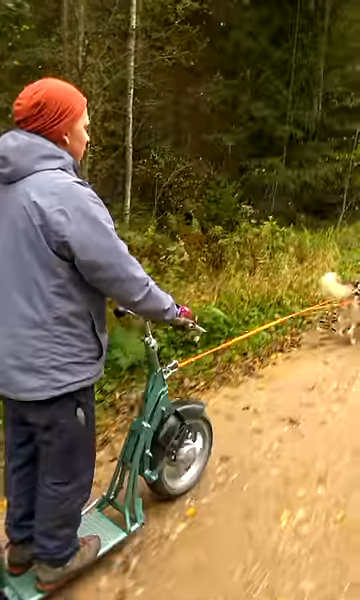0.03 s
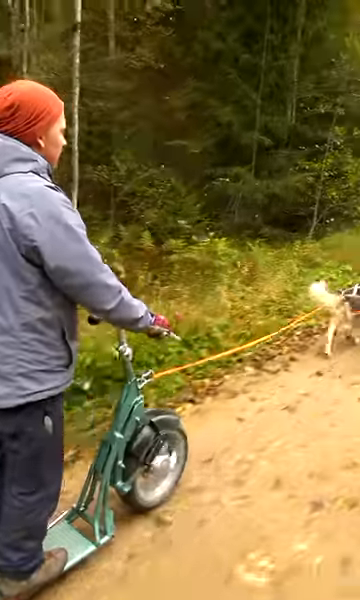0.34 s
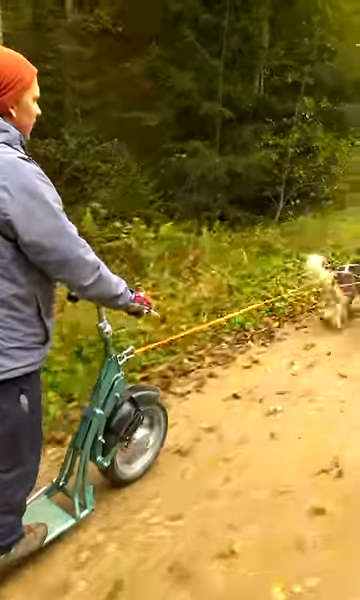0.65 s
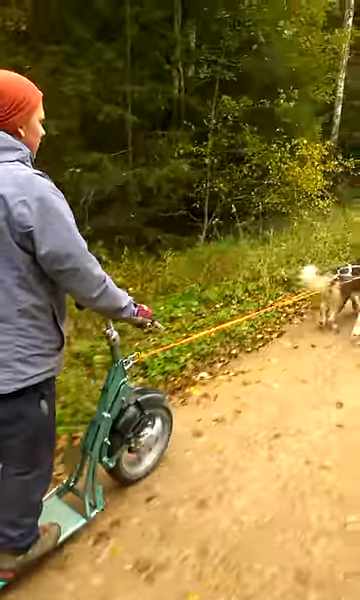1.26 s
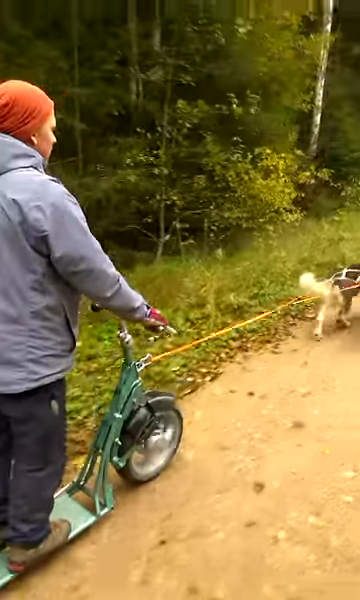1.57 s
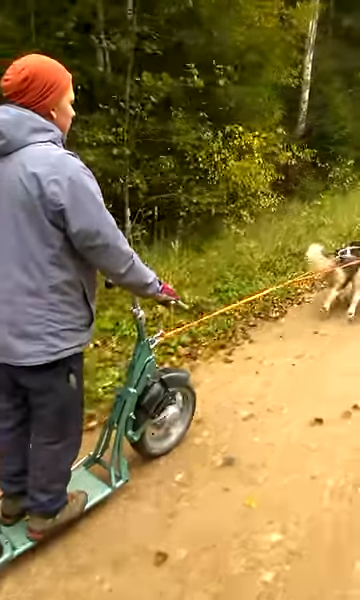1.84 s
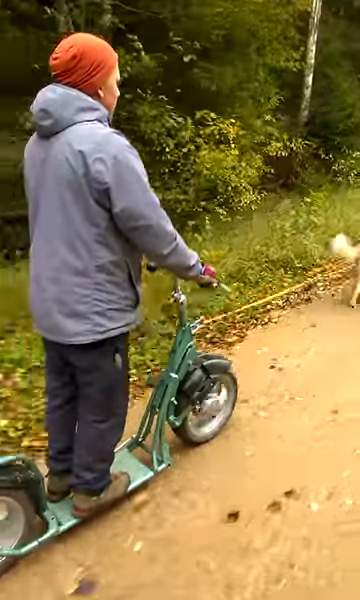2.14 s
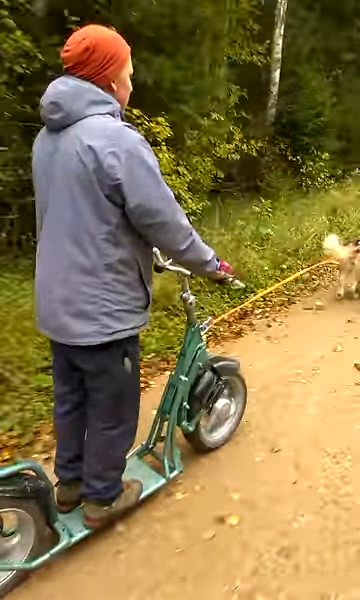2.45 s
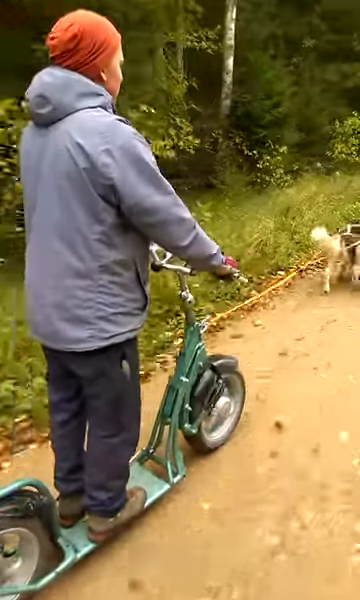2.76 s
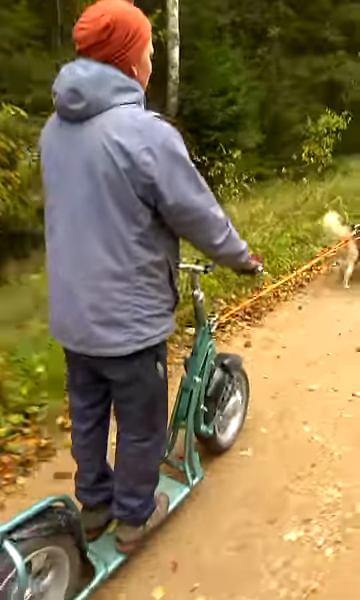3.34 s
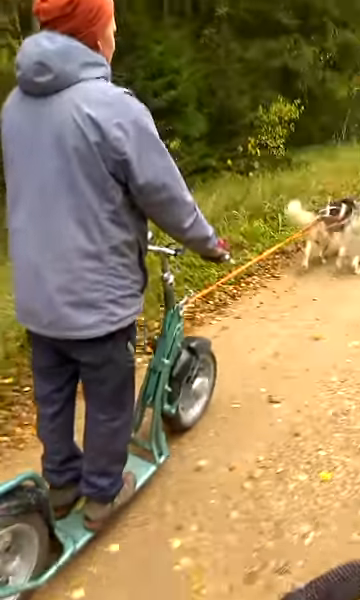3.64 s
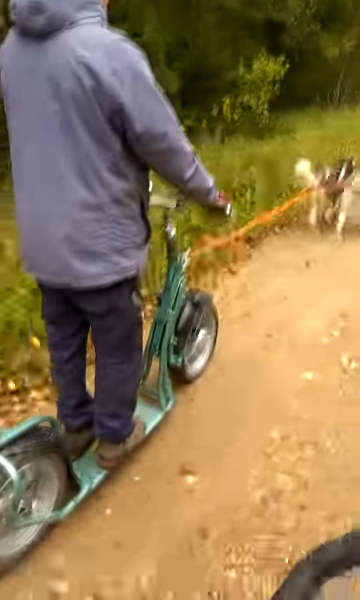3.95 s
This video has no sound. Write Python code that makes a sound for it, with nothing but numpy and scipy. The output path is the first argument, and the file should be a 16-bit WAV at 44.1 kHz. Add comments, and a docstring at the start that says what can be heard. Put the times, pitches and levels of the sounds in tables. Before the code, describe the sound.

Tyres crunch steadily over a gravel road while wind buffets the microphone.

```python
"""A dog-drawn scooter rolls along a gravel forest road, heard from a vehicle keeping pace.
From the start the tyres crunch grit, hiss through sand and scrub; headwind rumbles on one microphone.
From 0.1 s on, sand grains split, pinched pebbles snap aside and brief hollow scrapes sound.
Eddies thump on the microphone from 0.45 s, pause after 1.5 s and return at 2.5 s.
By 2.85 s the packed road has given way to looser grit; a low-ringing pebble ticks just before 3 s."""
import sys
import numpy as np
from scipy import signal
from scipy.fft import rfft, irfft
from scipy.io import wavfile
from scipy.ndimage import uniform_filter1d

SR = 44100
rng = np.random.default_rng(int(sys.argv[2]) if len(sys.argv) > 2 else 0)


def file_out(sig):
    """Save sig as 16-bit WAV at sys.argv[1]."""
    # one column per channel
    cols = np.atleast_2d(sig).T
    # limit, then scale
    lim = np.clip(cols, -1, 1)
    pcm = np.round(lim * 32767).astype(np.int16)
    wavfile.write(sys.argv[1], SR, pcm)


N = 176400
TIME_S = np.arange(N) / SR
TOP_HZ = 10600


def undb(db):
    """Decibels to gain."""
    return 10 ** (np.asarray(db) / 20)


def unit(x):
    """Scale to standard deviation 1."""
    return x / np.std(x)


def curve(rows):
    """Gain along rows of (time [s], level [dB])."""
    return undb(np.interp(TIME_S, *np.array(rows).T))


def colour(x, points):
    """Minimum-phase filter through points of (frequency [Hz], gain [dB])."""
    hz, db = np.array(points).T
    bins_hz = np.fft.rfftfreq(len(x), 1 / SR) + 1e-9
    gain = undb(np.interp(np.log(bins_hz), np.log(hz), db))
    cepstrum = irfft(np.log(gain), len(x))
    cepstrum[1:len(x) // 2] *= 2
    cepstrum[len(x) // 2 + 1:] = 0
    return irfft(rfft(x) * np.exp(rfft(cepstrum)), len(x))


def ring(x, hz, width_hz):
    """One resonance."""
    return signal.lfilter(*signal.iirpeak(hz, hz / width_hz, fs=SR), x)


def drift(rate_hz):
    """Smooth random drift, standard deviation 1."""
    span = max(int(SR / rate_hz), 2)
    smoothed = uniform_filter1d(rng.standard_normal(N), span, mode="wrap")
    return unit(uniform_filter1d(smoothed, span, mode="wrap"))


def clicks(per_s, spread_db):
    """Random impacts, most small, a few large."""
    strength = np.minimum(rng.exponential(size=N), 5)
    hits = rng.random(N) < per_s / SR
    return hits * rng.choice([-1, 1], N) * undb(spread_db * strength)


def grains(per_s, spread_db, ring_s, sizes=28):
    """Stones of many sizes, each ringing briefly at its own pitch."""
    pitches_hz = np.linspace(400, TOP_HZ, sizes)
    width_hz = 1 / (np.pi * ring_s)
    return unit(sum(ring(clicks(per_s / sizes, spread_db), hz, width_hz) for hz in pitches_hz))


def grit_crunch(ticks):
    """Grit rings under the tyres, first packed, then loose."""
    # Packed and loose grit spectra (frequency [Hz], gain [dB])
    packed_spectrum = [(500, -26.5), (1600, -10.5), (1850, -5), (2020, -6), (2270, 1), (2450, -0.5),
                       (2770, -4), (3000, 0), (3300, -5.5), (3800, -9), (4750, -9), (5600, -16),
                       (10500, -25.5)]
    loose_spectrum = [(500, -30.5), (1400, -12), (1700, -2), (2150, -3.5), (2400, 2), (3350, -0.5),
                      (4200, -9.5), (4780, -7), (5500, -13.5), (10500, -25)]
    # Crunch strength (time [s], level [dB])
    levels = [(.09, -45.5), (.275, -45), (.3, -48), (1, -48), (1.25, -50), (1.7, -49), (2.92, -48.5),
              (2.97, -44.5), (3.3, -44), (3.55, -45), (3.9, -47), (4, -44.5)]
    loose_from_s, loose_full_s = 2.2, 2.85
    grit = grains(per_s=6000, spread_db=3, ring_s=0.00095) + undb(-7.5) * ticks
    grit += undb(-1.5) * rng.standard_normal(N)
    packed = unit(colour(grit, packed_spectrum))
    loose = unit(colour(grit, loose_spectrum))
    looseness = np.clip((TIME_S - loose_from_s) / (loose_full_s - loose_from_s), 0, 1)
    return ((1 - looseness) * packed + looseness * loose) * curve(levels)


def sand_hiss(ticks):
    """Dense, fine impacts of sand merge into a hiss."""
    # Sand spectrum (frequency [Hz], gain [dB])
    spectrum = [(1500, -17.5), (3500, 2.5), (5000, 0.5), (6500, -3.5), (7500, -0.5), (8800, 0),
                (10500, -6.5)]
    # Hiss strength (time [s], level [dB])
    levels = [(.4, -56.5), (.95, -55), (1.5, -52.5), (1.82, -53.5), (1.89, -55.5), (2.92, -59.5),
              (3.08, -57), (3.56, -51.5), (3.62, -55), (4, -54)]
    fines = rng.standard_normal(N) + grains(per_s=9000, spread_db=4.7, ring_s=0.00043)
    fines += undb(-2) * ticks
    return unit(colour(fines, spectrum)) * curve(levels) * undb(1 + drift(rate_hz=70))


def tread_scrub(ticks):
    """The tread scrubs the road: dull, dense impacts."""
    # Tread spectrum (frequency [Hz], gain [dB])
    spectrum = [(300, 3.5), (480, -2.5), (555, 1.5), (620, -1), (760, 1), (1400, 0.5), (2000, -10),
                (4000, -23)]
    # Scrub strength (time [s], level [dB])
    levels = [(.12, -52), (.6, -55.5), (1.4, -55.5), (2.6, -57), (3.3, -52.5), (4, -57.5)]
    tread = unit(clicks(per_s=3000, spread_db=4.3)) + undb(-7.5) * ticks
    tread += grains(per_s=5000, spread_db=1.6, ring_s=0.0019)
    return unit(colour(tread, spectrum)) * curve(levels) * undb(-1.46 + 0.6 * drift(rate_hz=18))


def tyres():
    """Bumps vary the wheel load; grit, sand and tread follow it and share one train of ticks."""
    load_db = 0.71 * drift(rate_hz=23.3)
    ticks = unit(clicks(per_s=700, spread_db=1))
    return (grit_crunch(ticks) + sand_hiss(ticks) + tread_scrub(ticks)) * undb(load_db)


def headwind():
    """Turbulence flutters on the microphone over a deep rumble."""
    # Flutter and rumble spectra (frequency [Hz], gain [dB])
    flutter_spectrum = [(20, -44.5), (45, -31.5), (65, 1), (100, 0.5), (160, -6), (350, -20), (500, -33),
                        (1500, -67.5)]
    rumble_spectrum = [(4, -11), (25, 0.5), (50, -12.5), (90, -50)]
    # Flutter and rumble strength (time [s], level [dB])
    flutter_levels = [(.15, -45.5), (.38, -55), (.45, -42), (.7, -47), (1.1, -47), (1.3, -54.5), (1.6, -49),
                      (1.9, -55), (2.42, -53.5), (2.52, -45.5), (2.8, -39), (2.95, -47), (3.2, -43.5),
                      (3.52, -51.5), (3.62, -44.5), (4, -50.5)]
    rumble_levels = [(.1, -49), (2.95, -47), (3.13, -41), (3.33, -46), (4, -44)]
    flutter = unit(colour(rng.standard_normal(N), flutter_spectrum)) * curve(flutter_levels)
    flutter *= undb(-0.5 + 2.57 * drift(rate_hz=30))
    rumble = unit(colour(rng.standard_normal(N), rumble_spectrum)) * curve(rumble_levels)
    return flutter + rumble


def snap(scatter_s, size, fracture_s=0.0006):
    """Force of a stone giving way: first break, burst of fractures, scattering chips."""
    t = np.arange(size) / SR
    fractures = np.exp(-t / fracture_s)
    chips = np.exp(-t / scatter_s) * (1 - fractures)
    force = (0.45 * fractures + 0.2 * chips) * rng.standard_normal(size)
    force[0] = 1
    return force


def burst(x, db):
    """Scale to the energy of 10 ms at rms level db."""
    return unit(x) * undb(db) * np.sqrt(0.01 * SR / len(x))


def sand_splits(size=4096):
    """Sand grains split with a bright tick."""
    # Splitting grains (time [s], level [dB])
    splits = [(0.098, -47), (1.584, -47), (1.793, -48.5), (2.475, -54)]
    # Tick spectrum (frequency [Hz], gain [dB])
    spectrum = [(2000, -10), (8000, -2)]
    out = np.zeros(N + size)
    for at_s, db in splits:
        force = snap(scatter_s=0.0015, size=size)
        start = int(at_s * SR)
        out[start:start + size] += burst(colour(force, spectrum), db)
    return out[:N]


def pebbles(size=4096):
    """Pinched pebbles snap out with a crack and a short ring; more crack, higher ring."""
    # Pebbles under a tyre (time [s], ring level [dB], crack level [dB], chip scatter time [s])
    pinches = [(0.126, -41, -70, 0.0016), (0.166, -41, -53, 0.014), (0.271, -39, -60, 0.0026),
               (0.46, -46, -68, 0.0087), (0.5363, -45.5, -43.5, 0.0018), (0.656, -48, -58, 0.0044),
               (0.7212, -46, -60, 0.004), (0.761, -44, -59, 0.001), (0.8396, -42.5, -46, 0.0051),
               (0.844, -53, -48, 0.0024), (0.9764, -42, -69, 0.01), (1.368, -46, -61, 0.0011),
               (1.537, -44, -66, 0.003), (1.584, -46, -50, 0.00039), (1.625, -46.5, -76, 0.0041),
               (1.6958, -43.5, -53, 0.0041), (1.716, -60, -56, 0.00086), (1.763, -45.5, -72, 0.022),
               (1.841, -47, -52, 0.0026), (2.0417, -47, -50, 0.00093), (2.093, -52, -57, 0.001),
               (2.173, -63, -52, 0.0011), (2.217, -50, -45.5, 0.0026), (2.512, -47, -54, 0.00086),
               (3.121, -43, -47, 0.002), (3.2269, -40, -47, 0.0018), (3.2943, -39, -49, 0.0025),
               (3.299, -60, -46, 0.0028), (3.3563, -57, -65, 0.0012), (3.422, -45.5, -58, 0.0025),
               (3.557, -44, -44, 0.002), (3.573, -42, -45, 0.0028), (3.819, -47, -51, 0.00088),
               (3.8485, -47.5, -49, 0.001), (3.926, -40.5, -54, 0.001), (3.939, -47, -63, 0.002)]
    # Ring and crack spectra (frequency [Hz], gain [dB])
    ring_spectrum = [(600, -11), (2000, -7), (2300, 1.5), (2480, -2), (2720, -12), (3020, -1.5),
                     (3500, -7.5), (5000, -20.5)]
    crack_spectrum = [(300, -12), (1500, -31), (3000, 11), (5100, 4.5), (6000, -6.5), (10500, -22)]
    base_hz, octaves_per_db = 2970, 0.012
    out = np.zeros(N + size)
    for at_s, ring_db, crack_db, scatter_s in pinches:
        force = snap(scatter_s, size)
        hz = base_hz * 2 ** (octaves_per_db * (crack_db - ring_db))
        body = colour(ring(force, hz, width_hz=1100), ring_spectrum)
        crack = colour(force, crack_spectrum)
        start = int(at_s * SR)
        out[start:start + size] += burst(body, ring_db + 1.5) + burst(crack, crack_db + 1)
    return out[:N]


def scrapes_and_pebble_tick():
    """Hollow scrapes, and one short, low-ringing pebble tick just before 3 s: resonant noise."""
    # Scrapes and the tick (time [s], level [dB], centre [Hz], half length [s])
    events = [(0.132, -54.5, 660, 0.018), (0.225, -58, 1520, 0.0045), (1.287, -57.5, 1030, 0.031),
              (1.525, -56.5, 530, 0.016), (1.784, -57, 1250, 0.038), (2.28, -57, 1270, 0.09),
              (2.457, -51.5, 1650, 0.025), (2.834, -54, 1660, 0.023), (2.975, -40.5, 1830, 0.002),
              (3.275, -45, 1780, 0.0082)]
    out = np.zeros(N)
    for at_s, db, hz, half_s in events:
        width_hz = 0.38 * hz
        band = ring(ring(rng.standard_normal(N), hz, width_hz), hz, width_hz)
        envelope = np.exp(-np.minimum(((TIME_S - at_s) / half_s) ** 2 / 2, 20))
        out += unit(band) * envelope * undb(db + 0.5)
    return out


def buffets(size=8192):
    """Each eddy thumps with one swing of pressure and sheds a smaller, faster one."""
    # Eddies striking the microphone (time [s], level [dB], centre [Hz])
    eddies = [(.446, -22, 122), (0.49, -28.5, 102), (0.557, -30.5, 175), (0.621, -26.5, 135),
              (0.656, -33, 103), (0.76, -38, 121), (1.006, -33, 136), (1.069, -31.5, 129),
              (1.392, -33.5, 86), (1.536, -29, 111), (2.521, -28, 112), (2.584, -23.5, 150),
              (2.708, -21.5, 110), (2.773, -27, 108), (2.854, -30, 175), (2.895, -33.5, 133),
              (3.069, -23.5, 110), (3.115, -26.5, 106), (3.169, -24.5, 95), (3.216, -23, 132),
              (3.307, -27.5, 186), (3.44, -28, 117), (3.621, -30, 103), (3.791, -32.5, 189)]
    half_length_cycles, small_ratio, small_db = 0.52, 2.11, -12
    t = (np.arange(size) - size // 2) / SR
    out = np.zeros(N + size)
    for at_s, db, hz in eddies:
        large = np.cos(2 * np.pi * (hz * t + rng.random()))
        small = np.cos(2 * np.pi * (hz * small_ratio * t + rng.random()))
        envelope = np.exp(-(hz * t / half_length_cycles) ** 2)
        start = int(at_s * SR) - size // 2
        out[start:start + size] += (large + undb(small_db) * small) * envelope * undb(db - 4.5)
    return out[:N]


def scene():
    """Road and wind, identical in both channels."""
    road = tyres() + scrapes_and_pebble_tick() + pebbles() + sand_splits()
    wind = headwind() + buffets()
    return np.tile(road + wind, (2, 1))


def record(dry):
    """Hum notch in the bass, quick fade-in, steep treble cut."""
    notch_hz, width_hz = 48, 28
    start_s, fade_s = 0.079, 0.012
    notch = signal.iirnotch(notch_hz, notch_hz / width_hz, fs=SR)
    fade = np.clip((TIME_S - start_s) / fade_s, 0, 1)
    lowpass = signal.ellip(12, 0.2, 70, TOP_HZ, fs=SR, output="sos")
    return signal.sosfilt(lowpass, fade * signal.filtfilt(*notch, dry))


dry = scene()
out = record(dry)
file_out(out)
```